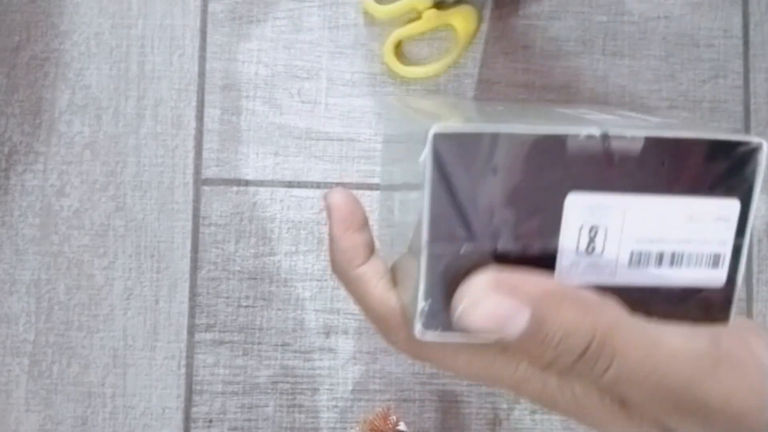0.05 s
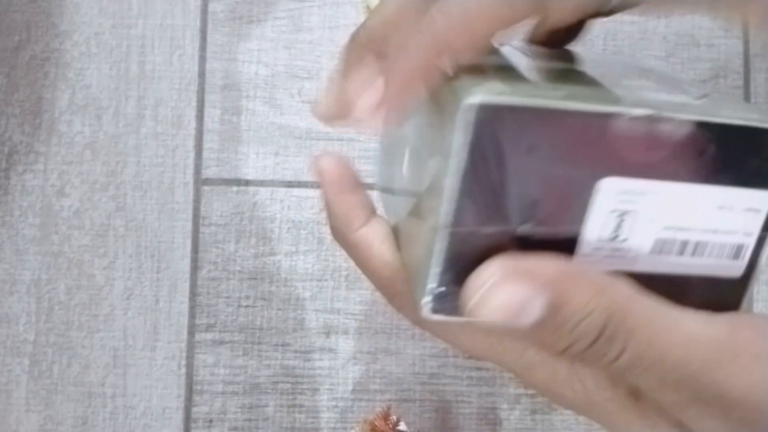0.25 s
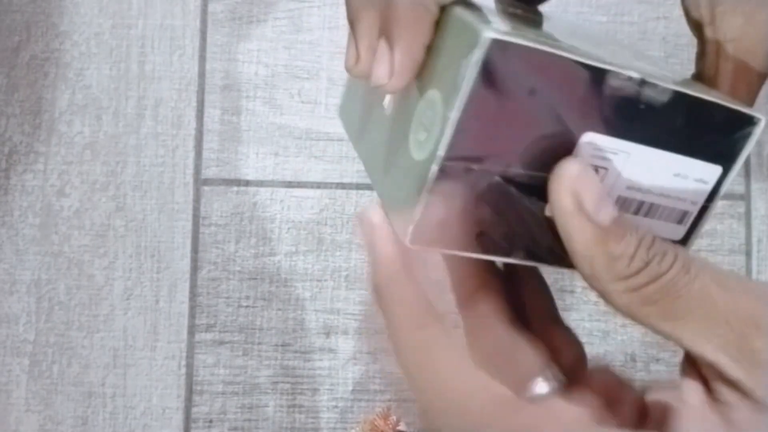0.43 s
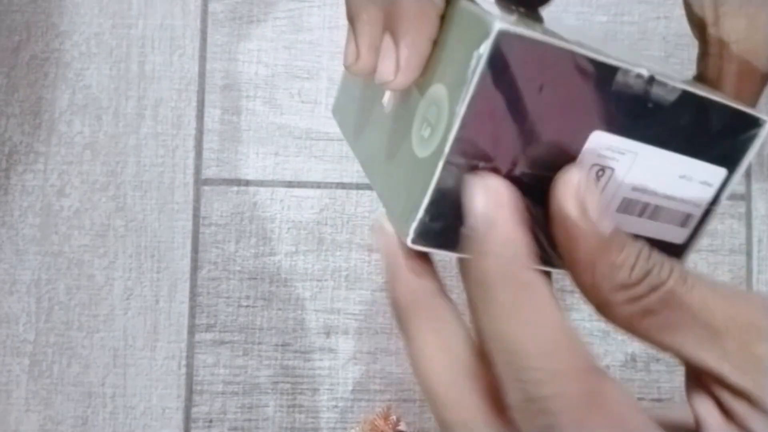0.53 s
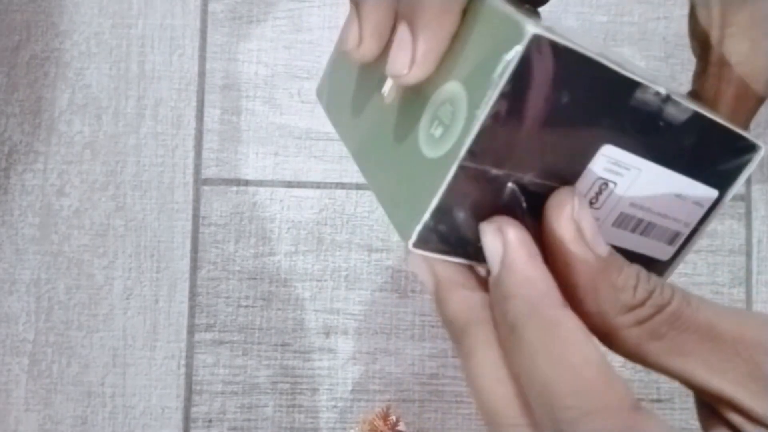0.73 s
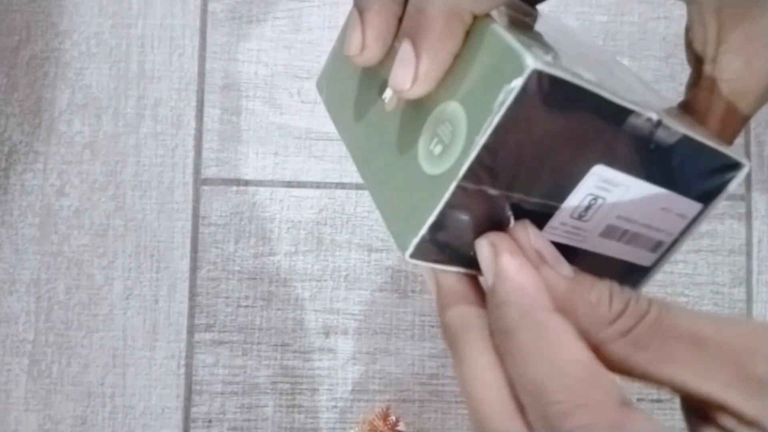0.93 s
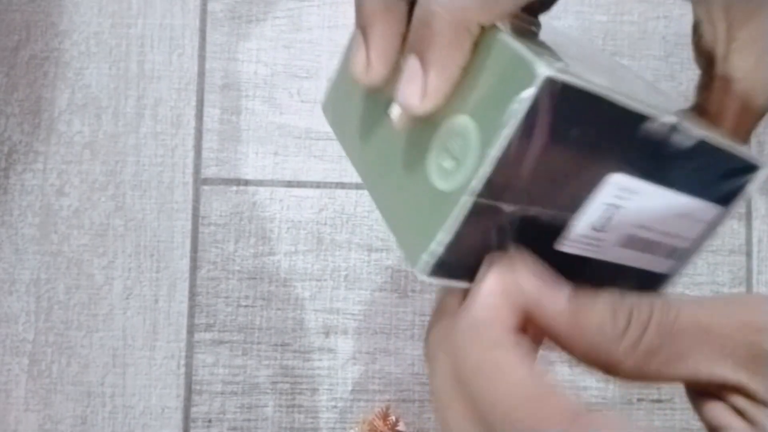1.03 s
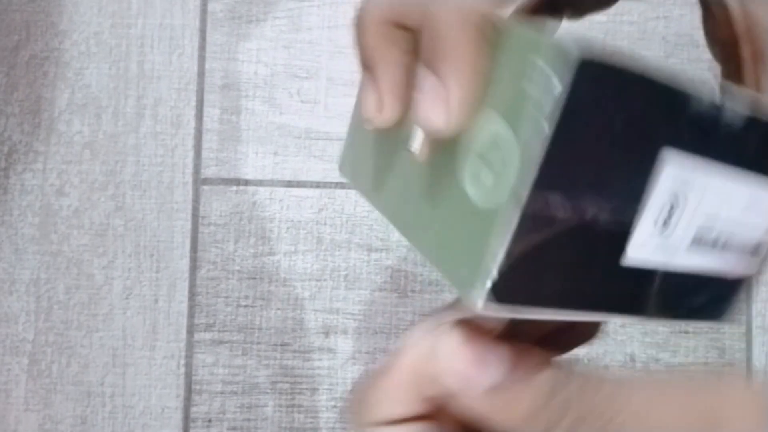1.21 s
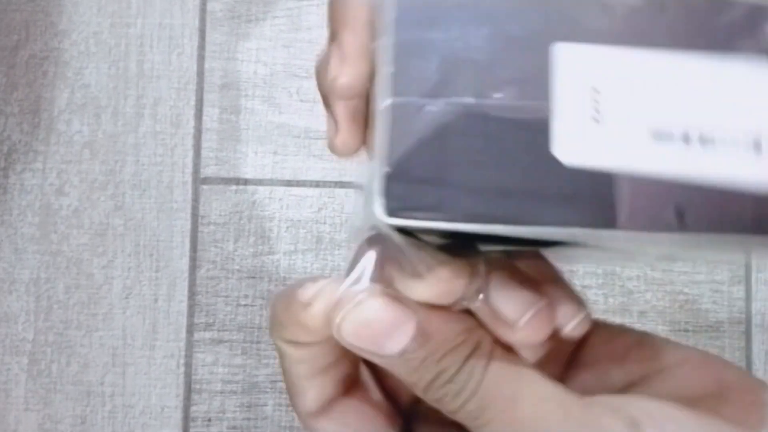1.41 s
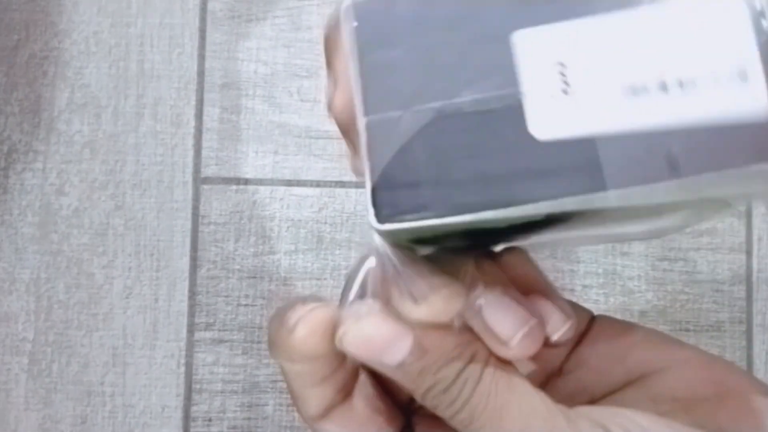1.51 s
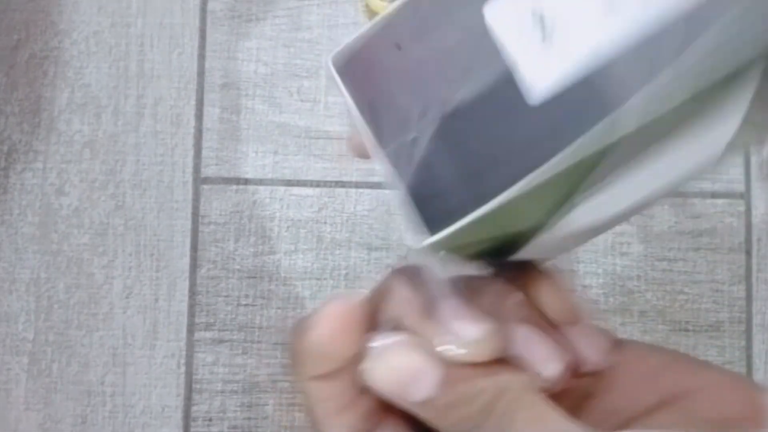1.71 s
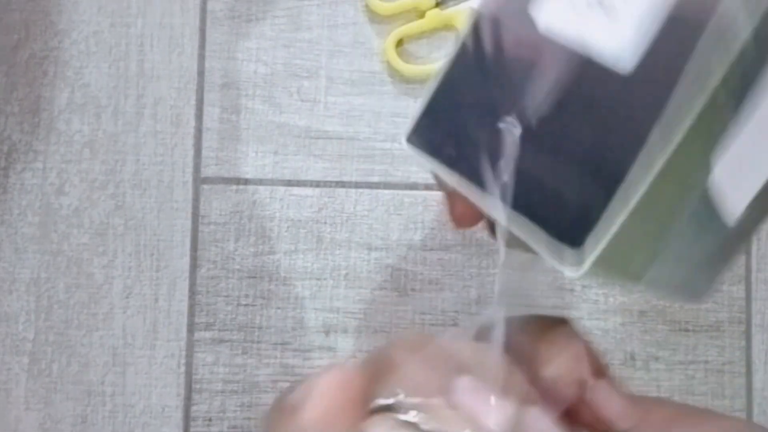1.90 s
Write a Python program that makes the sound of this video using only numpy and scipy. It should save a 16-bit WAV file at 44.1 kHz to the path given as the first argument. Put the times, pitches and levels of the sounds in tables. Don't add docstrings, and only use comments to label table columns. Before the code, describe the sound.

Shrink wrap crackling on a small hollow cardboard box, heard close in a small hard room. Near silence until 0.12 s, then a light tick; at 0.2 s a loud sharp snap with knock and low skin scuff, rustling and fading by 0.6 s. Quiet, with a clear tap at 0.94 s. From 1.2 s softer bright crinkles and tiny ticks thin out, then a crisper snap and rustle at 1.91 s.

```python
import sys
import numpy as np
from scipy import signal
from scipy.fft import rfft, irfft, next_fast_len
from scipy.io import wavfile
from scipy.ndimage import uniform_filter1d, map_coordinates

SR = 44100
rng = np.random.default_rng(int(sys.argv[2]) if len(sys.argv) > 2 else 0)


def dump(signal):
    limited = np.clip(np.atleast_2d(signal).T, -1, 1)
    pcm = np.round(limited * 32767).astype(np.int16)
    wavfile.write(sys.argv[1], SR, pcm)


def decibels_to_gain(level_db):
    exponent = np.asarray(level_db, float) / 20
    return 10 ** exponent


N = 85995

# centre_hz, width_hz, level_db
SHEET_MODES = [(1300, 130, 4), (2200, 150, 4), (2700, 200, -10), (3600, 250, -12), (4600, 350, -14)]


def unit(x):
    return x / np.sqrt(np.mean(x ** 2) + 1e-20)


def along(points, hz):
    point_hz, value = np.transpose(points)
    return np.interp(np.log(hz + 1), np.log(point_hz + 1), value)


def curve(rows):
    return np.interp(np.arange(N) / SR, *np.transpose(rows))


def wobble(rate_hz):
    knots = rng.standard_normal(int(N * rate_hz / SR) + 4)
    return map_coordinates(knots, [np.arange(N) * rate_hz / SR])


def filtered(x, response):
    size = next_fast_len(x.shape[-1] + 8192)
    spectrum = rfft(x, size) * response(np.fft.rfftfreq(size, 1 / SR))
    return irfft(spectrum, size)[..., :x.shape[-1]]


def resonances(modes):
    def response(f):
        total = 0
        for k, (hz, width, db) in enumerate(modes):
            damping = 1j * f * width
            total = total + (-1) ** k * decibels_to_gain(db) * damping / (hz * hz - f * f + damping)
        return total
    return response


def buckles(size, spiky_db):
    return unit(rng.standard_normal(size) * decibels_to_gain(spiky_db * rng.exponential(size=size)))


def background():
    # hz, level_db per Hz
    air_spectrum = [(18, -62.5), (30, -20), (388, -17.5), (659, -18.5), (1210, -21), (2050, -17),
                    (2340, -30.5), (3130, -22), (16500, -29)]
    # start_s, length_s, pitch_hz
    whine_events = [(-.1, .26, 655), (-.1, .2, 2090), (.44, .2, 450), (.56, .14, 358), (.67, .07, 325),
                    (.6, .22, 862), (.62, .14, 620), (.6, .2, 1520), (.72, .26, 200), (1.03, .16, 850),
                    (1.02, .27, 139), (1.52, .14, 190), (1.78, .14, 150), (1.74, .16, 650)]
    whine_levels = [-77, -83, -64, -70, -68, -76, -78, -82, -80, -75, -61.5, -75, -74, -86]
    whine_roughness = [.15, .1, .5, .5, .4, .4, .8, .5, .7, .6, .2, .9, .8, .5]
    air_db, patch_db, drift_hz = -85 + 3.5, 5.2, 24

    z = signal.stft(rng.standard_normal((2, N)), nperseg=1024)[2]
    patches = uniform_filter1d(rng.standard_normal(z.shape[1:]), size=3, axis=0)
    patches = uniform_filter1d(patches, size=8, axis=1)
    pair = signal.istft(z * decibels_to_gain(patch_db * unit(patches)), nperseg=1024)[1][:, :N]
    pair = pair[0] + 0.63 * pair
    out = decibels_to_gain(air_db) * unit(filtered(pair, lambda f: decibels_to_gain(along(air_spectrum, f))))

    t = np.arange(N) / SR
    for (start_s, length_s, hz), db, rough in zip(whine_events, whine_levels, whine_roughness):
        drift = rough * drift_hz * np.sqrt(hz / 1000) * wobble(59.87)
        turns = np.cumsum(hz + drift) / SR
        swell = np.sin(np.pi * np.clip((t - start_s) / length_s, 0, 1))
        flutter = 1 - rough + rough * wobble(90)
        out = out + decibels_to_gain(db) * flutter * swell * np.sin(2 * np.pi * turns)
    return out


def rustle():
    # start_s, level_db, brightness_db
    pull = [(0, -82.5, -5.5), (.118, -99, -10.5), (0.125, -69.5, -9.5), (.18, -63.5, -6.5),
            (0.22, -63, -14), (.33, -52.5, -3.5), (0.422, -57, -4.5), (0.502, -62, -2), (0.618, -77, 2),
            (.78, -93.5, 0), (1.19, -86, -1.5), (1.205, -55.5, -1.5), (1.429, -55, -1), (1.458, -62, -3.5),
            (1.62, -68.5, 0), (1.78, -61.5, -2), (1.889, -79, -4.5), (1.919, -52.5, 0)]
    # hz, level_db per Hz
    film_spectrum = [(400, -34), (1250, -14), (1750, -22), (2250, -3), (3150, -13), (4400, 0), (11000, -2),
                     (16000, -10)]
    sheet = resonances(SHEET_MODES)
    start_s, level_db, tilt_db = np.transpose(pull)

    clumps = decibels_to_gain(1.5 * wobble(90) + 2.5 * wobble(260))
    grit = clumps * buckles(size=(2, N), spiky_db=2.5)
    grit = filtered(grit, lambda f: decibels_to_gain(along(film_spectrum, f)) * (1 + np.abs(sheet(f))))
    grit = unit(grit[0] + 0.5 * grit)

    low = filtered(grit, lambda f: 1 / (1 + (f / 3300) ** 4))
    tilt = decibels_to_gain(2 * curve(np.transpose([start_s, tilt_db])))
    level = decibels_to_gain(curve(np.transpose([start_s, level_db])))
    return level * (low / tilt + (grit - low) * tilt)


def rub():
    # start_s, level_db
    rub_levels = [(0, -84.5), (.118, -73.5), (.13, -54), (.18, -62.5), (.22, -42), (.33, -51.5),
                  (.37, -61.5), (.5, -59.5), (.62, -75.5), (.9, -84.5), (1.19, -73.5), (1.21, -60.5),
                  (1.42, -64), (1.48, -72), (1.6, -71.5), (1.77, -69.5), (1.85, -85.5), (1.93, -61.5)]
    # hz, level_db per Hz
    card_spectrum = [(30, -28), (100, -4), (150, 2.5), (260, -2), (480, -13), (1200, -15), (2000, -37)]
    lumps = decibels_to_gain(2 * wobble(25) + 3 * wobble(90))
    scuff = filtered(rng.standard_normal((2, N)), lambda f: decibels_to_gain(along(card_spectrum, f)))
    return decibels_to_gain(curve(rub_levels)) * unit(lumps * (scuff[0] + 0.3 * scuff))


def slide():
    # start_s, level_db
    slide_levels = [(.11, -100), (.13, -65), (.2, -56), (.215, -60), (.25, -46), (.4, -57), (.55, -66.5),
                    (.72, -72), (.8, -92), (.93, -90), (1.9, -93), (1.93, -56.5)]
    # hz, level_db per Hz
    palm_spectrum = [(200, -23.5), (400, 3), (700, -1), (1200, -1), (2000, -5), (3500, -26)]
    friction = decibels_to_gain(2 * wobble(70)) * rng.standard_normal((2, N))
    murmur = filtered(friction, lambda f: decibels_to_gain(along(palm_spectrum, f)))
    return decibels_to_gain(curve(slide_levels)) * unit(murmur[0] + 0.76 * murmur)


def snaps():
    # start_s, level_db, pitch_hz, length_s
    film_snaps = [(0.1191, -54, 5800, 0.0068), (0.1231, -42.5, 2130, 0.0062), (0.182, -52.5, 6960, 0.014),
                  (0.1939, -33.5, 4400, 0.0082), (0.206, -17, 7650, 0.012), (0.2114, -12.5, 2135, 0.005),
                  (.2125, -21.5, 8300, 0.004), (0.2681, -21, 4446, 0.0072), (0.3027, -30, 3730, 0.012),
                  (0.473, -51.5, 8600, 0.013), (0.491, -41, 9500, 0.0096), (0.505, -43.5, 2310, 0.0061),
                  (0.633, -59, 2285, 0.0097), (0.927, -63.5, 2500, 0.017), (0.9425, -42.5, 9000, 0.0038)]
    # start_s, level_db, pitch_hz, length_s
    seam_ticks = [(1.175, -60.5, 9200, .003), (1.2008, -44, 8434, .003), (1.225, -49, 7700, .005),
                  (1.241, -46, 7900, 0.003), (1.2595, -44, 7000, 0.002), (1.2635, -45, 4500, .004),
                  (1.286, -47, 11000, .006), (1.2905, -43, 5500, 0.004), (1.319, -44.5, 7500, 0.003),
                  (1.332, -48, 10000, 0.0023), (1.3415, -44.5, 10000, 0.004), (1.37, -52, 4300, .003),
                  (1.38, -51, 7000, .002), (1.401, -53, 9000, .005), (1.407, -45, 4100, 0.003),
                  (1.43, -48, 7400, 0.003), (1.4635, -51, 5500, .003), (1.5385, -52, 5000, .002),
                  (1.5508, -41, 10100, 0.007), (1.558, -47, 5500, .005), (1.586, -54, 9000, .0015),
                  (1.65, -56, 9700, .006), (1.692, -50, 7550, 0.003), (1.7065, -55, 5500, .002),
                  (1.731, -57, 3970, 0.002), (1.746, -56, 4500, .003), (1.7598, -49, 4700, 0.004),
                  (1.7735, -51, 9500, .003), (1.796, -54, 8000, .002), (1.84, -60, 4200, .003),
                  (1.905, -48, 3700, .005), (1.9098, -31, 4500, 0.0028), (1.9215, -42, 3000, .004),
                  (1.9352, -30, 2500, 0.0008), (1.943, -43, 2500, .004)]
    rise_share, longest_rise_s = 0.28, 0.003
    relative_width, skirt = 0.74, 0.045

    out, t = np.zeros((2, N + SR)), np.arange(2048) / SR
    for start_s, db, hz, length_s in film_snaps + seam_ticks:
        rise_s = min(rise_share * length_s, longest_rise_s)
        rise = 1 - np.exp(-(t / rise_s) ** 2)
        fall = np.exp(-(t / length_s) ** 2) + 0.089 * np.exp(-t / 0.015)
        shape = rise * fall
        hump = resonances([(hz, relative_width * hz, 0)])
        grit = buckles(size=(2, len(t)), spiky_db=-0.5)
        grit = grit[1] + 2.4 * grit
        grit = shape * filtered(grit, lambda f: hump(f) + skirt * f / (f + 1500))
        level = decibels_to_gain(db - 3) * np.sqrt(np.mean(shape ** 2))
        out[:, round(start_s * SR):][:, :len(t)] += level * unit(grit)
    return out[:, :N]


def plucks():
    # start_s, peak_db
    nail_plucks = [(0.1243, -41), (.143, -54), (1.265, -51), (1.376, -51), (1.408, -50), (1.431, -55),
                   (1.539, -52), (1.558, -46), (1.776, -56), (1.7965, -41), (1.8405, -46), (1.911, -33)]
    sheet = resonances(SHEET_MODES)
    out, t = np.zeros(N + SR), np.arange(2048) / SR
    for start_s, db in nail_plucks:
        since = t - 0.0015
        scrape = 0.2 * rng.standard_normal(len(t)) * np.exp(-(since / 0.001) ** 2)
        slip = np.exp(-(since / 0.00009) ** 2) + scrape
        ring = filtered(slip, lambda f: sheet(f) * (f / (f + 1500)) ** 2)
        out[round((start_s - 0.001) * SR):][:len(t)] += decibels_to_gain(db) * ring / np.abs(ring).max()
    return out[:N]


def taps():
    # start_s, peak_db, thud over the ring in thud_db
    finger_taps = [(0.1857, -40.5, 17), (0.211, -20, 2), (0.271, -27, -10.5), (0.304, -34.5, -20),
                   (0.459, -44.5, 13.5), (.636, -53, -4.5), (0.824, -45, -13.5), (.834, -59.5, 19),
                   (0.9412, -21, -24), (0.953, -40, 4.5), (1.204, -54, 25), (1.336, -56.5, 9),
                   (1.505, -58.5, 0), (1.67, -68, -1), (1.916, -53.5, 22), (1.926, -48, -6),
                   (1.935, -38.5, -6)]
    # centre_hz, width_hz, level_db
    box_modes = [(436, 360, -13), (592, 235, 1.5), (984, 159, 3.5), (1740, 260, -11.5), (2416, 160, -16),
                 (3140, 170, -11.5), (5292, 250, -18)]
    firm_db, firm_push_s, softer_per_db = -20, 0.00007, 0.45
    box, thud = resonances(box_modes), resonances([(293, 260, 0)])

    out, t = np.zeros(N + SR), np.arange(4096) / SR
    for start_s, db, thud_db in finger_taps:
        push_s = firm_push_s * decibels_to_gain(softer_per_db * (firm_db - db) / 2)
        skin = 0.04 * rng.standard_normal(len(t)) * np.exp(-t / 0.00067)
        push = np.exp(-((t - 0.0004) / push_s) ** 2) + skin

        def body(f):
            return box(f) * (1j * f / (400 + 1j * f)) ** 2 + decibels_to_gain(thud_db) * thud(f) ** 2

        knock = filtered(push, body)
        out[round(start_s * SR):][:len(t)] += decibels_to_gain(db) * knock / np.abs(knock).max()
    return out[:N]


def room(x):
    # hz, time to fall 60 dB in decay_s
    wall_decay = [(150, 0.19), (700, 0.29), (1500, 0.24), (3000, 0.3), (12000, 0.22)]
    build_up_s = 0.0013
    hz, t, z = signal.stft(rng.standard_normal((2, SR // 2)), SR, nperseg=256)
    fall_db = -60 * t / along(wall_decay, hz)[:, None]
    tail = signal.istft(z * decibels_to_gain(fall_db), SR, nperseg=256)[1]
    tail = tail * (1 - np.exp(-(np.arange(tail.shape[1]) / SR / build_up_s) ** 2))
    return signal.fftconvolve(x[None], tail / np.linalg.norm(tail[0]), axes=1)[:, :N]


def scene():
    # start_s, left over right in level_db
    place = [
        (0, -2),
        (.3, -1),
        (.5, 0),
        (.9, -11),
        (1.1, -4),
        (1.4, -3.5),
        (1.55, -4.5),
        (1.95, -4),
    ]
    # start_s, level_db
    echo = [
        (0, 0),
        (1.1, 0),
        (1.2, -6),
        (1.88, -9),
        (1.92, -2),
    ]
    # hz, level_db
    wall_colour = [(150, -7), (700, -3.5), (1500, 5.5), (3000, 0.5), (12000, 1)]
    lag_s, wet_db = 0.0002942, -4.5

    near = rustle() + rub() + slide() + snaps() + plucks() + taps()
    side = np.array([[1], [-1]])
    ports = filtered(near, lambda f: np.exp(-1j * np.pi * f * side * lag_s))
    ports = decibels_to_gain(side * curve(place) / 2) * ports
    walls = room(decibels_to_gain(curve(echo)) * near.mean(axis=0))
    walls = filtered(walls, lambda f: decibels_to_gain(along(wall_colour, f)))
    return ports + decibels_to_gain(wet_db) * walls + background()


def top_cut(x):
    return signal.sosfilt(signal.butter(12, 16970, fs=SR, output="sos"), x)


def record(dry):
    # hz, level_db
    port_treble = [(9000, 2), (13000, 0.5), (15600, -5), (16200, -28), (17500, -47)]
    low_cut_hz = 59
    threshold_db, slope, depth_db, wide_db = -63.5, 0.59, 18, -7.5

    def port(f):
        low_cut = 0.12 + (1j * f / (low_cut_hz + 1j * f)) ** 2
        return decibels_to_gain(along(port_treble, f)) * low_cut

    z = signal.stft(filtered(dry, port), nperseg=512)[2]
    power = np.mean(np.abs(z) ** 2, axis=0)
    power = uniform_filter1d(uniform_filter1d(power, size=7, axis=0), size=5, axis=1)
    key = np.abs(power) + decibels_to_gain(2 * wide_db) * np.abs(power).mean(axis=0)
    key_db = 10 * np.log10(key + 1e-20) + 24
    cut_db = np.clip(slope * (key_db - threshold_db), -depth_db, 0)
    mix = signal.istft(z * decibels_to_gain(cut_db), nperseg=512)[1][:, :N]
    return top_cut(mix)


dry = scene()
out = record(dry)
dump(out)
```